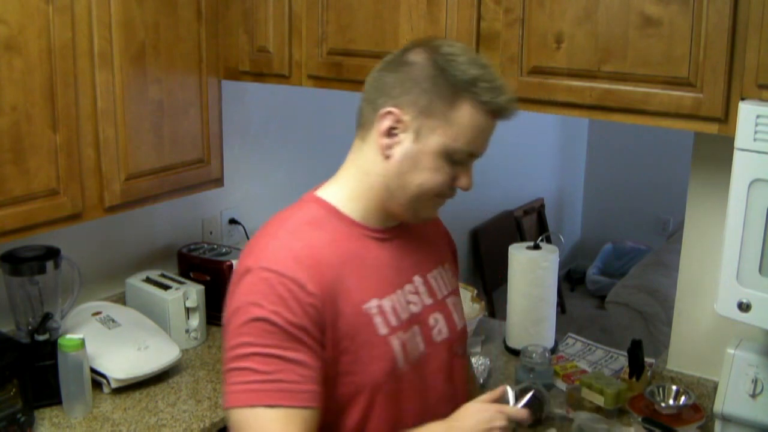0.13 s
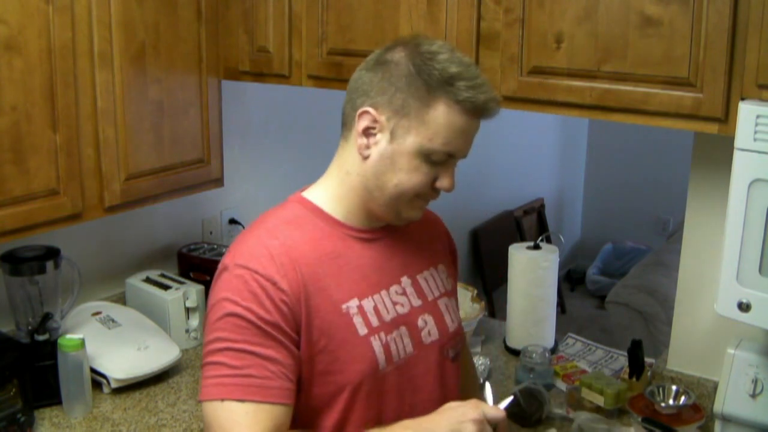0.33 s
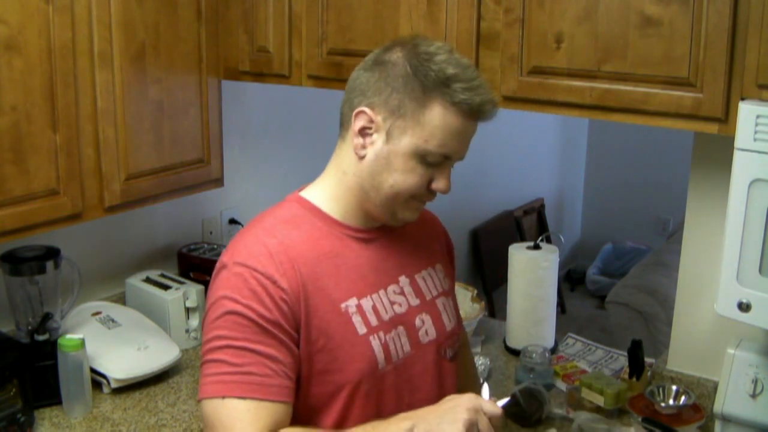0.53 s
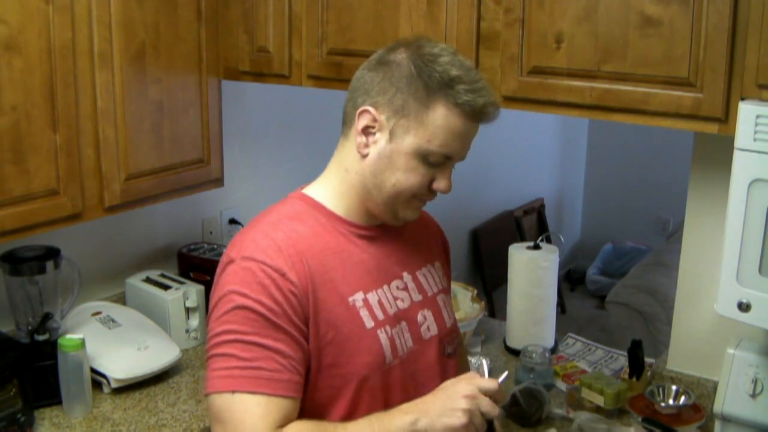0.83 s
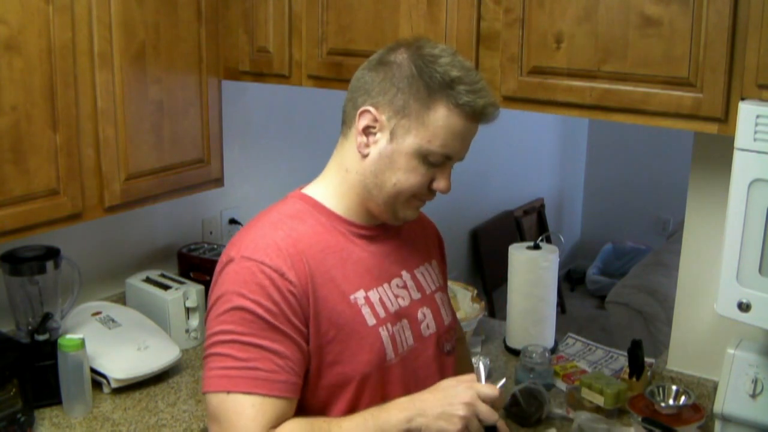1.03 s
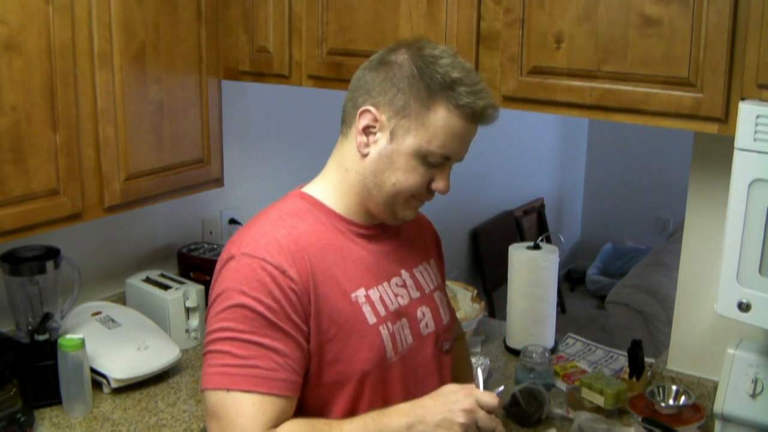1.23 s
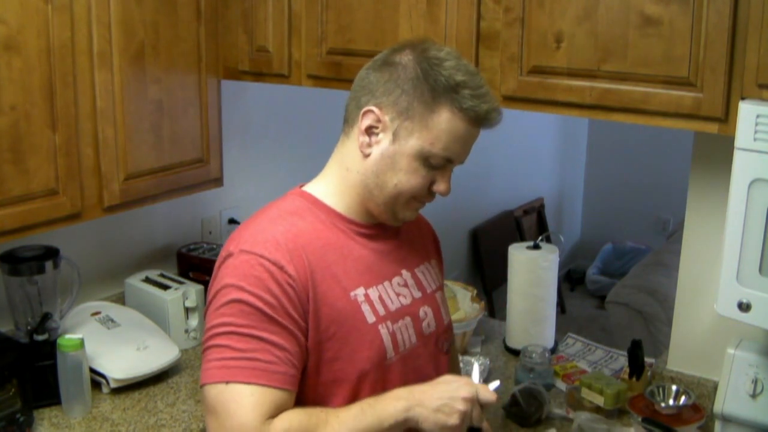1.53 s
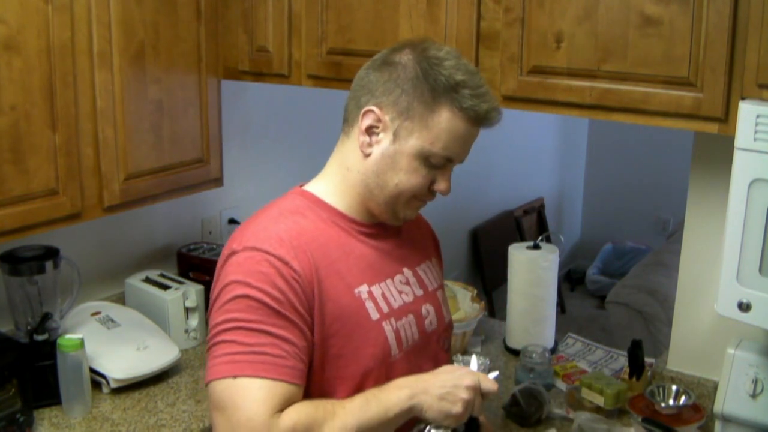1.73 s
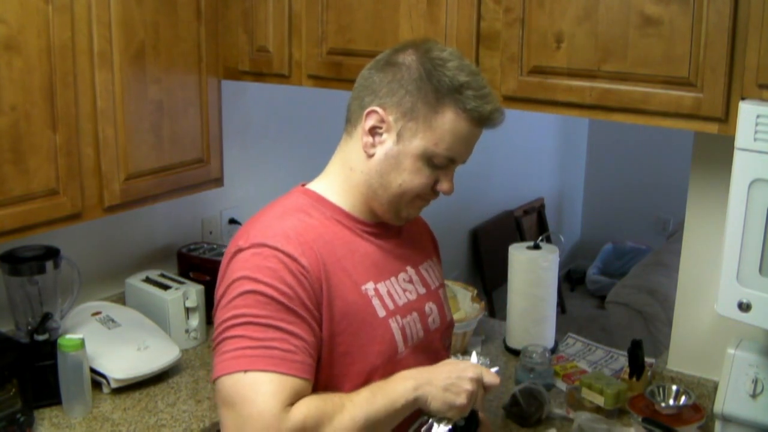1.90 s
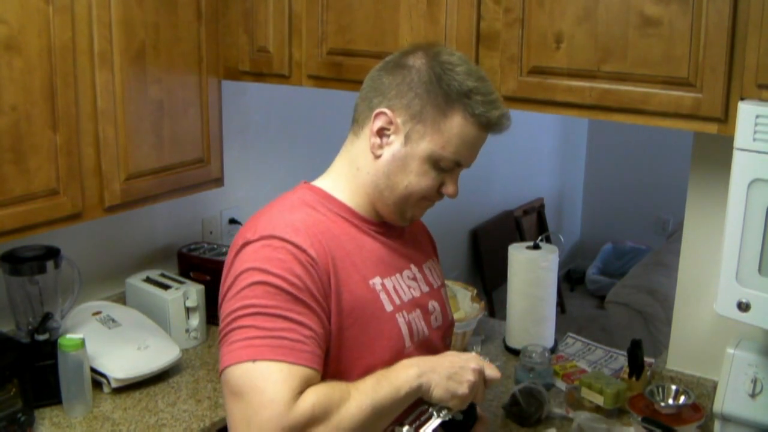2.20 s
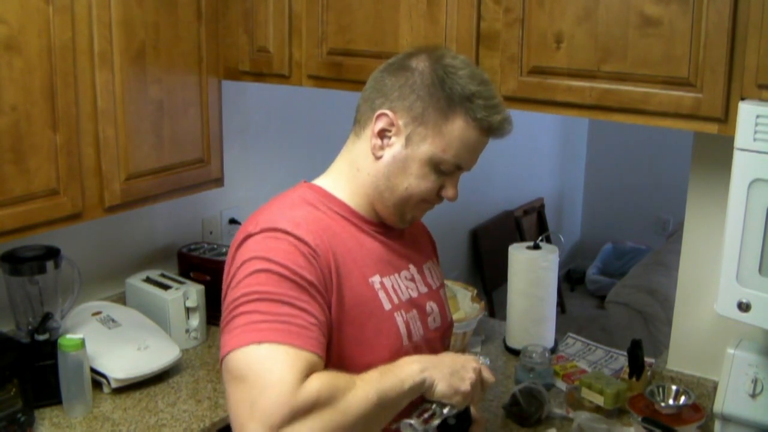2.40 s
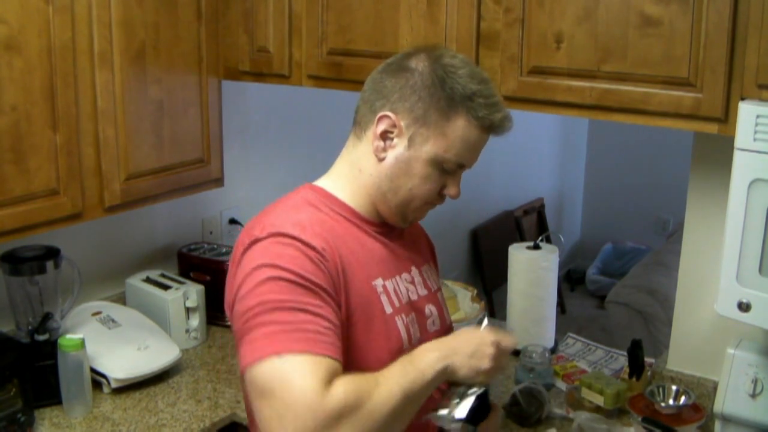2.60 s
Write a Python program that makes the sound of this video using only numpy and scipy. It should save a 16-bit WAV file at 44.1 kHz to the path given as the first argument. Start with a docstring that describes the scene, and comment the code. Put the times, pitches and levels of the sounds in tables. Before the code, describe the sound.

A metal cap is pried off a glass bottle, close in a small, hard kitchen with faint room tone and hum. A cluster of glassy clinks and scrapes comes at 0.17-0.4 seconds, then sparse faint scrapes and knocks until 1.5. Gas hisses, swelling from 1.55 and stopping abruptly near 1.75. Soft bumps follow around 2.1-2.2, then a tiny creak and loud, sharp pop at 2.37, with a short room tail.

```python
"""Steel scrapes and clinks on a glass bottle, close by, in a small hard kitchen; then gas hisses out
under the bent cap, the metal creaks and the cap pops off. Two close microphone ports of a camera listen.
Dying sines make the rings and knocks, filtered clicks the scrapes, creak and cracks, and shaped noise
the gas and room tone. Random reflections place the bottle in the room."""
import sys
import numpy as np
from scipy import signal
from scipy.fft import rfft, irfft
from scipy.io import wavfile
from scipy.ndimage import uniform_filter1d

SR = 44100
rng = np.random.default_rng(int(sys.argv[2]) if len(sys.argv) > 2 else 0)


def unload_audio(sound):
    """Save the sound as a 16-bit wav file, at the path given as the first command line argument."""
    columns = np.transpose(np.atleast_2d(sound))
    # keep every value between -1 and 1, then stretch to whole-number steps
    steps = np.round(np.clip(columns, -1, 1) * 32767)
    wavfile.write(sys.argv[1], SR, steps.astype(np.int16))


N = 121275  # samples, 2.75 s

# cap creaking before it lets go: [t/s, level/dB]
CREAK_LEVELS = [(2.332, -64), (2.342, -45), (2.35, -54.5), (2.358, -33.5), (2.367, -30), (2.371, -18),
                (2.379, -27), (2.401, -38)]
# cracks of the cap letting go: [t/s, peak level/dB, tilt/dB per octave]
POP_CRACKS = [(2.3686, -8.5, -4.5), (2.3708, -8.5, -4), (2.3745, -2.5, 1.6), (2.378, -9.5, 10)]
# colour of creak and pop: [f/Hz, relative density/dB]
POP_COLOUR = [(300, -22), (600, -20.5), (1000, -10), (1900, -2), (3400, -7), (5600, -3), (7000, -8.5),
              (11000, -14.5), (16000, -21.5)]
# modes of bottle neck and cap: [f/Hz, relative level/dB, t60/s]
CAP_MODES = [(419, -28, 0.036), (683, -16.5, 0.17), (739, -9.5, 0.11), (776.4, -8.5, 0.22),
             (1651, -8, 0.11), (1870, -4, 0.075), (2044, -2.5, .08), (2240, -4, 0.068), (3150, 0, 0.07),
             (4080, -6, 0.19), (5030, -19, 0.14), (5420, -2, 0.096), (5507, -12, 0.22), (6130, -1, 0.033)]
POP_DECAY_S, CAP_RING_DB = 0.0003, -19.5

# opener touching the glass: [t/s, contact length/s, glass ring level/dB, opener ring level/dB, crack level/dB]
OPENER_CLINKS = [(0.048, 0.03, -63, -60, -51.5), (0.107, 0.0097, -67, -60, -52),
                 (0.138, 0.041, -66, -60, -47.5), (0.172, 0.0098, -24.5, -50, -33),
                 (.189, 0.0076, -29.5, -50, -36), (.209, 0.0064, -25.5, -33, -32.5),
                 (0.22, 0.0038, -38, -41, -35), (.253, 0.0082, -34.5, -59, -48),
                 (.312, 0.008, -35.5, -54, -40), (0.355, 0.011, -52, -54, -39.5),
                 (0.538, 0.016, -73, -48, -63), (0.594, 0.013, -60, -45, -44.5),
                 (0.619, 0.027, -64, -58, -57.5)]
# modes of the glass bottle: [f/Hz, relative level/dB, t60/s]
GLASS_MODES = [(1940, -9.5, 0.035), (2618, -11.5, 0.054), (3760, -20.5, .1), (4600, -12.5, 0.045),
               (5145, -3, 0.045), (5262, -5.5, 0.19), (5330, -28, 0.017), (8450, -17, .03),
               (9800, -32, .04)]
# modes of the steel opener: [f/Hz, relative level/dB, t60/s]
STEEL_MODES = [(5600, -9, 0.036), (5970, -2, .02), (6110, 0.5, .05), (6300, -13, 0.017), (6880, -10, 0.022),
               (10100, -7, .05)]
# colour of the contact crackle: [f/Hz, relative density/dB]
CRACK_COLOUR = [(300, -16), (800, -17.5), (2650, -6), (4400, -5.5), (5700, 3), (7200, -6.5), (16000, -12.5)]

# opener scraping the crimped rim: [t/s, rise/s, length/s, level/dB, tilt/dB per octave]
RIM_SCRAPES = [(0., 0.0009, 0.022, -53.5, -0.5), (.168, 0.021, 0.072, -43, -2.2),
               (0.309, .012, 0.032, -46, -3), (0.349, 0.0057, 0.047, -49, -3),
               (.49, 0.026, 0.12, -62, -1.5), (0.661, 0.012, 0.055, -62.5, -1.5),
               (0.732, 0.013, 0.045, -55.5, -2), (0.76, 0.0057, 0.026, -38, 1.5),
               (.79, 0.015, 0.045, -48, 1), (0.884, .02, 0.092, -67.5, -2.5),
               (1.058, 0.0034, 0.038, -56.5, -5.5), (1.109, 0.009, 0.11, -49.5, -1),
               (1.322, 0.0047, 0.051, -57, -3.5), (1.456, 0.017, 0.056, -67.5, -3.5)]
# colour of the scraping: [f/Hz, relative density/dB]
SCRAPE_COLOUR = [(120, -59), (200, -13.5), (749, -11), (916, -10.5), (1020, -5.5), (1370, -10), (1680, -6),
                 (4120, -5.5), (5630, -2), (16000, -7)]
GRIT_PER_S, GRIT_SPREAD_DB, SCRAPE_RELEASE_S = 9000, 2, 0.021

# gas leaking under the cap: [t/s, level/dB, lower edge f/Hz]
LEAK_PATH = [(1.53, -71.5, 3240), (1.575, -51.5, 2920), (1.644, -42.5, 2630), (1.69, -38, 2400),
             (1.718, -33, 2140), (1.743, -34.5, 2170), (1.76, -72, 2100), (1.8, -77, 2100)]
# colour of the gas jet: [f/Hz, relative density/dB]
GAS_COLOUR = [(2300, 3), (2800, -1), (3500, -3), (6800, -4), (10000, -1.5), (16000, -4)]
GAS_LOW_DB, GAS_FLUTTER_DB = -20.5, 1.5  # floor added at all frequencies; rms flutter

# damped tones of hand and bottle knocks, close rows make one knock: [t/s, level/dB, f/Hz, t60/s]
KNOCK_TONES = [(1.065, -47, 1100, 0.026), (1.064, -49, 2520, .05), (1.067, -53, 1860, 0.044),
               (1.33, -57, 600, 0.026), (1.34, -52, 377, .04), (.365, -45, 1070, 0.028),
               (.538, -58, 10100, 0.13), (2.114, -54, 420, 0.016), (2.214, -51.5, 450, .025)]
# the bottle kicks in the hand: [t/s, level/dB, f/Hz, t60/s]
BOTTLE_KICK = (2.368, -43, 150, .05)

# decay of the kitchen: [f/Hz, t60/s]
ROOM_DECAY = [(100, 0.16), (400, 0.37), (1500, 0.3), (5000, 0.33), (10000, 0.31), (16000, 0.27)]
ROOM_DB, ROOM_GAP_S = 3, .003
RING_SEND_DB = -5  # rings are mixed drier than the noises, so their pitches stay clear and steady
SLOW_DB, SLOW_LONGER = -20, 2.22  # a weaker, slower second slope in the kitchen's decay
# stereo width, gain on the side signal: [f/Hz, gain/dB]
SIDE_WIDTH = [(60, 1), (110, -21.5), (200, -4.5), (380, -14), (700, -11.5), (1290, -12.5), (2380, -8),
              (4400, -4.5), (8120, 0.5), (15000, 1.5)]
SIDE_DIRECT, TURNS_PER_S, LOW_CUT_HZ = 0.97, 9, 355

# colour of the room tone: [f/Hz, relative density/dB]
AIR_COLOUR = [(12, -26.5), (20, -13), (86, -1.5), (146, -7), (187, -8), (222, -16.5), (434, -5.5),
              (660, -19.5), (825, -13.5), (1120, -21.5), (1220, -15), (1810, -21.5), (2140, -22.5),
              (2910, -23), (16000, -29.5)]
AIR_DB = -65  # rms level before the swell
# width of the room tone, gain on its side signal: [f/Hz, gain/dB]
AIR_SIDE = [(60, -19), (110, -4), (200, -5), (380, -3.5), (700, -1), (1290, -3.5), (2380, 1), (4400, 2),
            (8120, -2), (15000, 5.5)]
# appliance hum, before a common 3.5 dB lift to sine amplitude: [f/Hz, level/dB]
HUM_TONES = [(120, -83), (240, -77), (840, -80.5), (1200, -84.5)]
NOTCH_HZ, NOTCH_Q, EDGE_HZ = 7870, 80, 15680


def pop():
    """The cap creaks in uneven surges, then snaps free in quick cracks; the first rings cap and neck."""
    rings = np.zeros(N)
    s, db = np.transpose(CREAK_LEVELS)
    creak_db = np.interp(np.arange(N) / SR, s, db, -120, -120)
    creak = evened(grit(N)) * amp(creak_db)
    cracks = signal.oaconvolve(creak, colour(POP_COLOUR, 0.77))[:N]
    for s, db, tilt_db in POP_CRACKS:
        add(cracks, s, amp(db) * burst(POP_DECAY_S, colour(POP_COLOUR, tilt_db)))
    add(rings, POP_CRACKS[0][0], amp(CAP_RING_DB) * ring(CAP_MODES))
    return np.array([rings, cracks])


def clinks():
    """Each brief rubbing contact stills the last ring, rings the glass and the opener anew, and crackles."""
    rings, cracks = np.zeros((2, N))
    following = OPENER_CLINKS[1:] + [(1, 1)]
    for (s, length, glass_db, steel_db, crack_db), after in zip(OPENER_CLINKS, following):
        glass = amp(glass_db) * ring(GLASS_MODES, rise=length / 2)
        steel = amp(steel_db) * ring(STEEL_MODES, rise=length / 2)
        tones = glass + steel
        until_next = after[0] - s - np.arange(len(tones)) / SR
        stilled = np.clip(1 + until_next / (after[1] / 2), 0, 1)
        add(rings, s, tones * stilled)
        count = round(max(length, .002) * SR)
        rubbing = np.hanning(count) * evened(grit(count))
        add(cracks, s, amp(crack_db) * np.convolve(rubbing, colour(CRACK_COLOUR)))
    return np.array([rings, cracks])


def scrapes():
    """Rim grit under the opener: dense clicks under a rise, a hold and a release."""
    out = np.zeros(N)
    for s, rise, length, db, tilt_db in RIM_SCRAPES:
        t = np.arange(0, length, 1 / SR)
        hold = np.clip(np.minimum(t / max(rise, .001), (length - t) / SCRAPE_RELEASE_S), 0, 1)
        rubbing = hold * evened(grit(len(t)))
        add(out, s, amp(db) * np.convolve(rubbing, colour(SCRAPE_COLOUR, tilt_db)))
    return out


def leak():
    """Fluttering jet noise whose lower edge falls as the gap widens."""
    frames = dict(nperseg=256, noverlap=192)
    hz, t, noise = signal.stft(rng.standard_normal(N), SR, **frames)
    s, db, edge_hz = np.transpose(LEAK_PATH)
    edge_now = np.interp(t, s, edge_hz)
    edge = 1 / (1 + (edge_now / (hz[:, None] + 1)) ** 20) + amp(GAS_LOW_DB)
    gas = amp(read(GAS_COLOUR, np.maximum(hz, 2300)))
    gas = gas / np.sqrt(np.mean(gas ** 2))
    flutter = evened(uniform_filter1d(rng.standard_normal(len(t)), size=3))
    level = amp(np.interp(t, s, db, -120, -120) + GAS_FLUTTER_DB * flutter)
    return signal.istft(noise * edge * gas[:, None] * level, SR, **frames)[1][:N]


def knocks():
    """Hand and bottle bump: damped tones; rows close in time together make one knock."""
    out = np.zeros(N)
    for s, db, hz, t60 in KNOCK_TONES:
        add(out, s, ring([(hz, db, t60)], .1))
    return out


def kick():
    """The bottle kicks in the hand: one low damped tone with a soft start."""
    out = np.zeros(N)
    s, db, hz, t60 = BOTTLE_KICK
    add(out, s, ring([(hz, db, t60)], .1, rise=0.002))
    return out


def kitchen(direct, send):
    """Direct sound plus reflections, steadily crossfading two random rooms for an even reverberation."""
    turn = 2 * np.pi * TURNS_PER_S * np.arange(N) / SR
    wet = np.zeros((2, N))
    for share in (np.cos(turn), np.sin(turn)):
        wet += signal.fftconvolve((send * share)[None], reflections(), axes=1)[:, :N]
    # the ports hear the direct sound slightly apart in time: a quarter-cycle shift stands in for it
    across = SIDE_DIRECT * signal.hilbert(direct).imag
    return np.array([direct + wet[0], shaped(across + wet[1], SIDE_WIDTH)])


def reflections():
    """Sparse random reflections for mid and side, each band dying at its own speed in two slopes."""
    taps = np.zeros((2, SR // 2))
    at = np.arange(round(ROOM_GAP_S * SR), SR // 2 - 12, 12)
    at = at + rng.integers(0, 12, (2, len(at)))
    np.put_along_axis(taps, at, rng.choice([-1., 1.], at.shape), 1)
    hz, t, bands = signal.stft(taps, SR, nperseg=256)
    fall_db = -60 * t / read(ROOM_DECAY, hz)[:, None]
    first, second = amp(fall_db), amp(SLOW_DB + fall_db / SLOW_LONGER)
    tail = signal.istft(bands * np.hypot(first, second), SR, nperseg=256)[1]
    return amp(ROOM_DB) * tail / np.linalg.norm(tail[0])


def air():
    """Room tone of shaped noise with a slow random swell, and a faint appliance hum of steady sines."""
    t = np.arange(N) / SR
    mid, side = (shaped(rng.standard_normal(N), AIR_COLOUR) for _ in range(2))
    swell = amp(2.15 * evened(uniform_filter1d(rng.standard_normal(N), size=3000)))
    hum = sum(amp(db + 3.5) * np.sin(2 * np.pi * (hz * t + rng.random())) for hz, db in HUM_TONES)
    scale = amp(AIR_DB) * swell / mid.std()
    return np.array([scale * mid + hum, scale * shaped(side, AIR_SIDE)])


def ring(modes, seconds=.4, rise=0.00021):
    """Dying sines, each struck with slightly varying strength."""
    t = np.arange(0, seconds, 1 / SR)
    tones = np.zeros(len(t))
    for hz, db, t60 in modes:
        fall = amp(db + 1.5 * rng.standard_normal() - 60 * t / t60)
        tones += fall * np.sin(2 * np.pi * hz * t)
    return tones * np.minimum(t / max(rise, 1e-4), 1)


def burst(decay_s, taps):
    """A click with a short noisy shudder after it, peak 1."""
    t = np.arange(0, 6 * decay_s, 1 / SR)
    shudder = 0.22 * rng.standard_normal(len(t)) * np.exp(-t / decay_s)
    x = np.convolve((t == 0) + shudder, taps)
    return x / abs(x).max()


def grit(count):
    """Dense clicks of uneven size and random sign, as from a rough surface."""
    size = amp(GRIT_SPREAD_DB * np.minimum(rng.exponential(1, count), 4))
    sign = rng.choice([-1., 1.], count)
    return size * sign * (rng.random(count) < GRIT_PER_S / SR)


def colour(points, tilt_db=0):
    """Causal minimum-phase filter of unit energy with the given spectrum, tilted about 4 kHz."""
    hz = np.abs(np.fft.fftfreq(2048, 1 / SR))
    log_gain = np.log(amp(read(points, hz) + tilt_db * np.log2((hz + 100) / 4000)))
    phase = -signal.hilbert(log_gain).imag
    taps = np.fft.ifft(np.exp(log_gain + 1j * phase)).real[:1024]
    return taps / np.linalg.norm(taps)


def shaped(x, points):
    """Multiplies the spectrum of x by a dB table."""
    gain = amp(read(points, np.fft.rfftfreq(len(x), 1 / SR)))
    return irfft(rfft(x) * gain, len(x))


def read(points, hz):
    """Reads a table between its points along log frequency."""
    f, value = np.transpose(points)
    return np.interp(np.log(hz + 1), np.log(f + 1), value)


def amp(db):
    """Amplitude factor of a level in dB."""
    return 10 ** (np.asarray(db) / 20)


def evened(x):
    """Scales x to an rms of 1."""
    return x / np.sqrt(np.mean(x ** 2) + 1e-20)


def add(mix, s, sound):
    """Lays a sound into the mix at s seconds, cut at the end."""
    part = mix[round(s * SR):][:len(sound)]
    part += sound[:len(part)]


def scene():
    """Bottle and opener close to the ports, the kitchen around them, room tone behind."""
    sources = pop() + clinks() + [knocks(), scrapes() + leak()]
    low_cut = signal.butter(6, LOW_CUT_HZ, "high", fs=SR, output="sos")
    rings, noises = signal.sosfilt(low_cut, sources)  # small things make no bass
    rings = rings + kick()
    mid, side = kitchen(rings + noises, amp(RING_SEND_DB) * rings + noises) + air()
    return np.array([mid + side, mid - side])


def record(dry):
    """The microphone channel: a narrow treble notch, applied twice, then the band limit."""
    notch = signal.iirnotch(NOTCH_HZ, NOTCH_Q, SR)
    notched = signal.lfilter(*notch, signal.lfilter(*notch, dry))
    band_limit = signal.firwin(511, EDGE_HZ, window=("kaiser", 9), fs=SR)
    return signal.oaconvolve(notched, band_limit[None], "same")


dry = scene()
out = record(dry)
unload_audio(out)
```